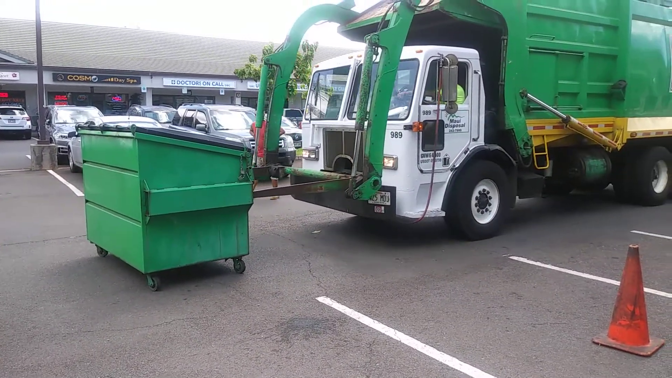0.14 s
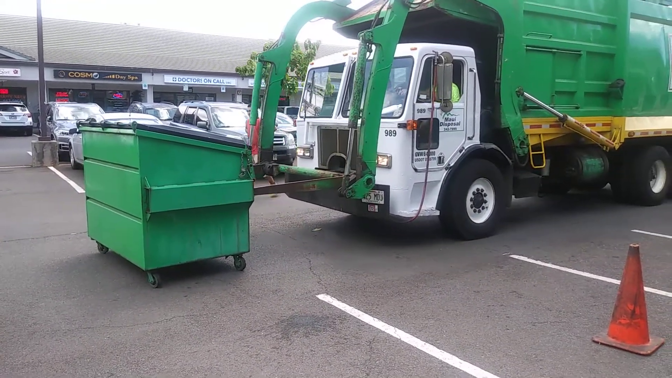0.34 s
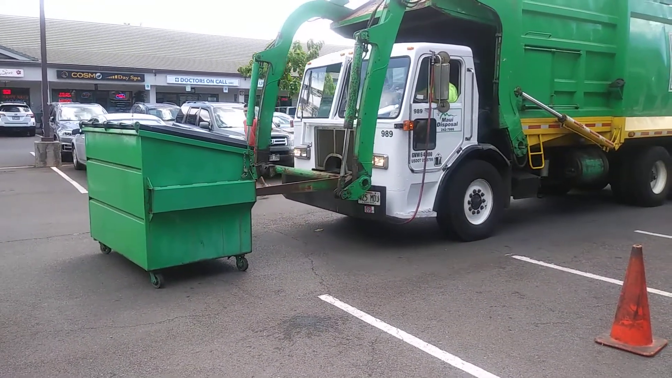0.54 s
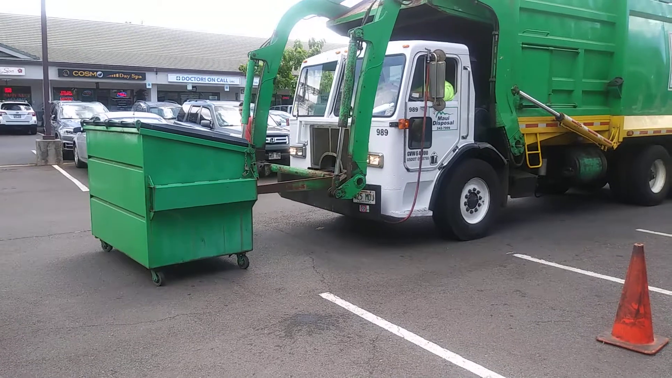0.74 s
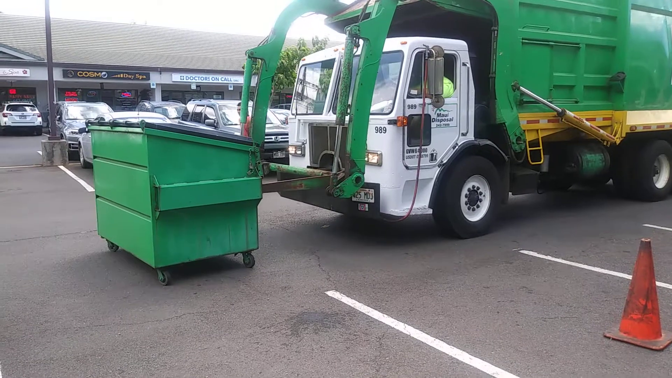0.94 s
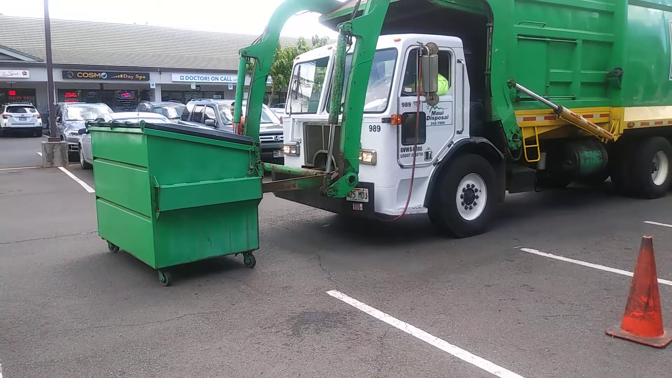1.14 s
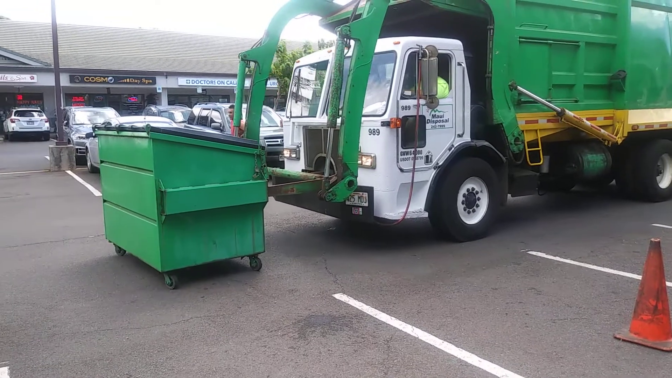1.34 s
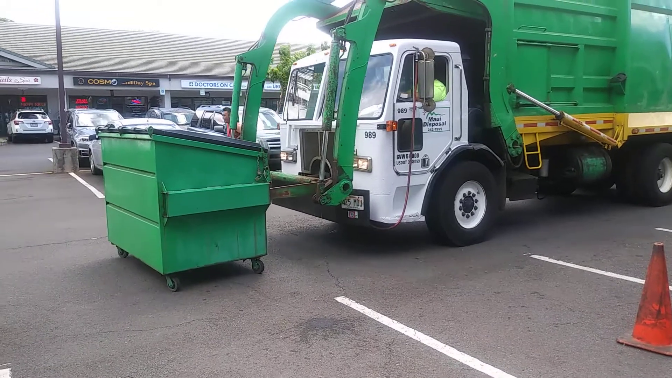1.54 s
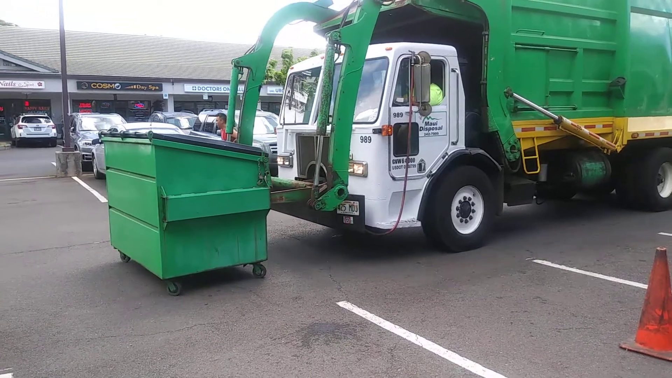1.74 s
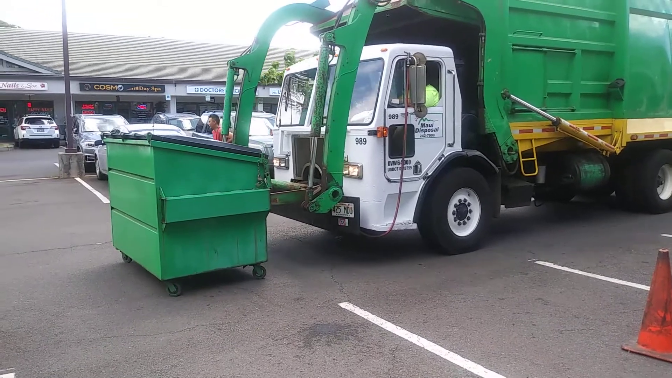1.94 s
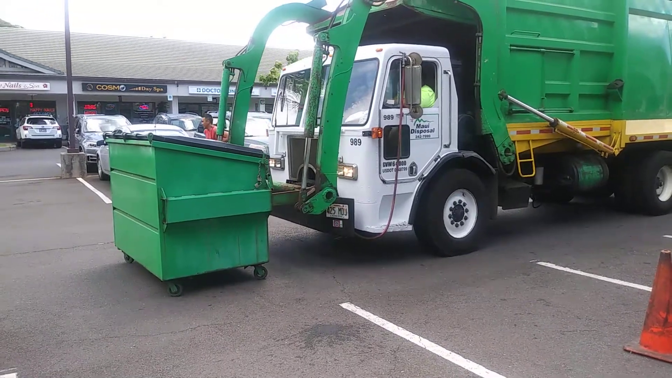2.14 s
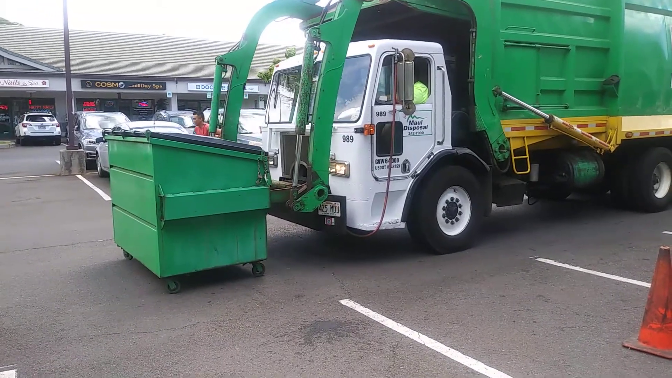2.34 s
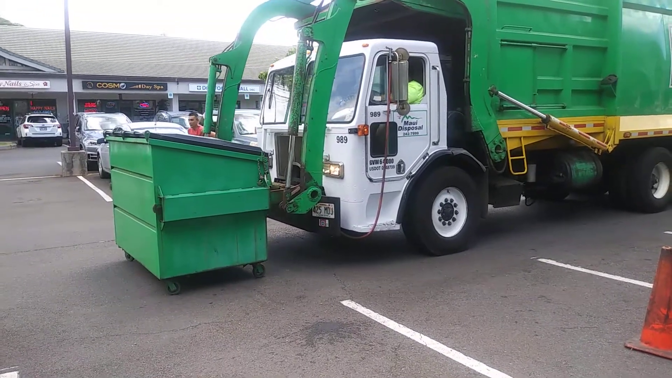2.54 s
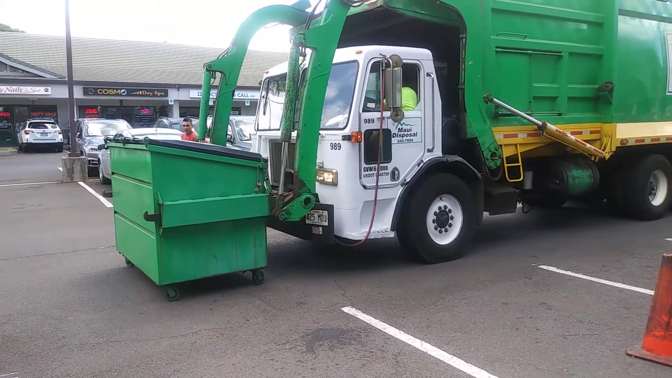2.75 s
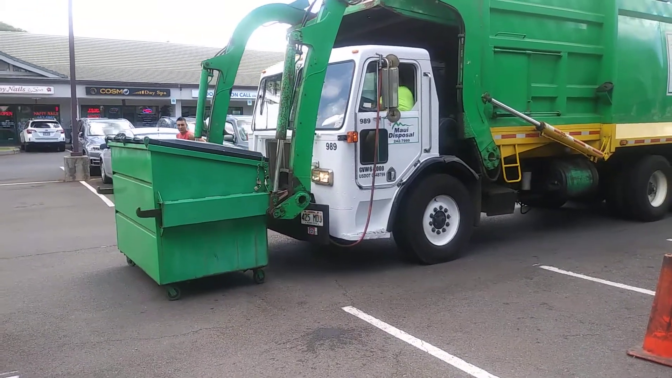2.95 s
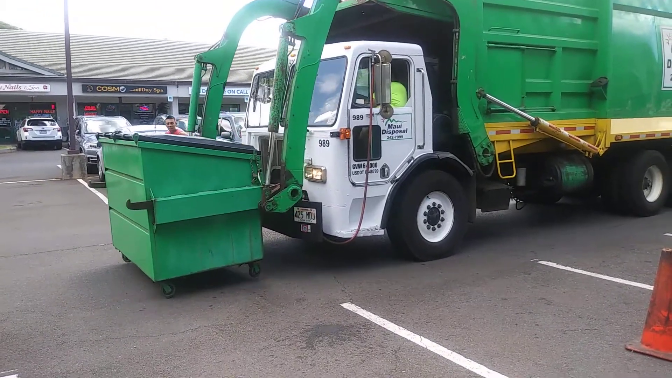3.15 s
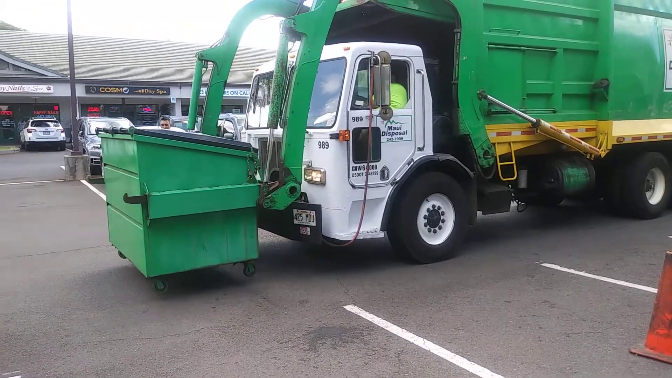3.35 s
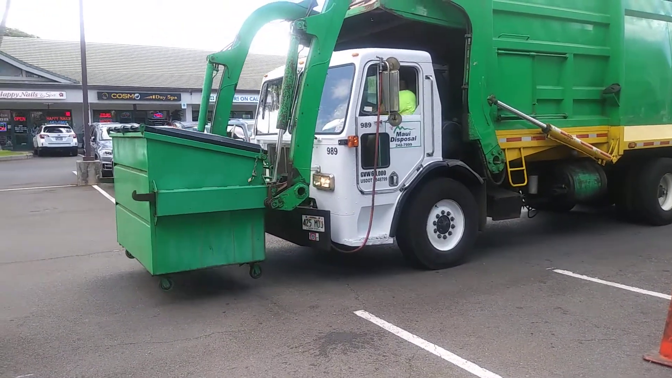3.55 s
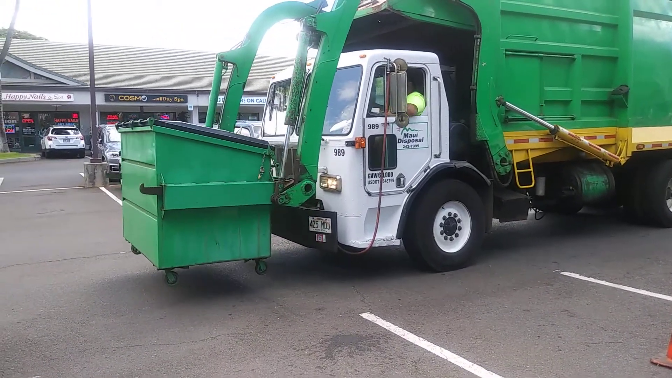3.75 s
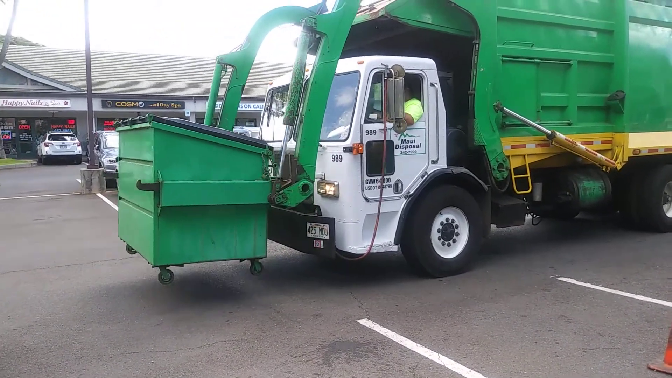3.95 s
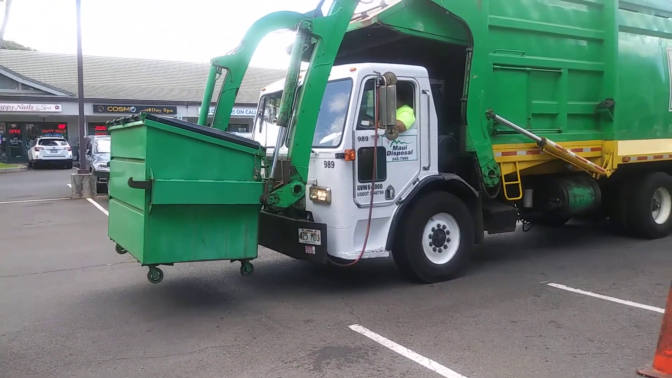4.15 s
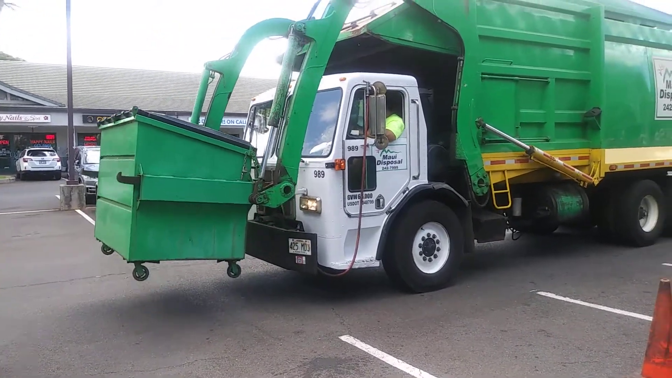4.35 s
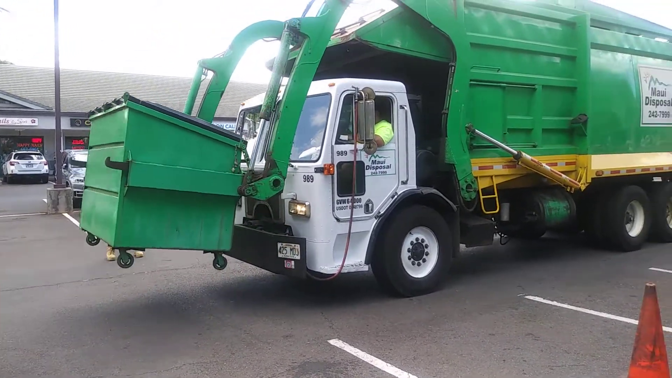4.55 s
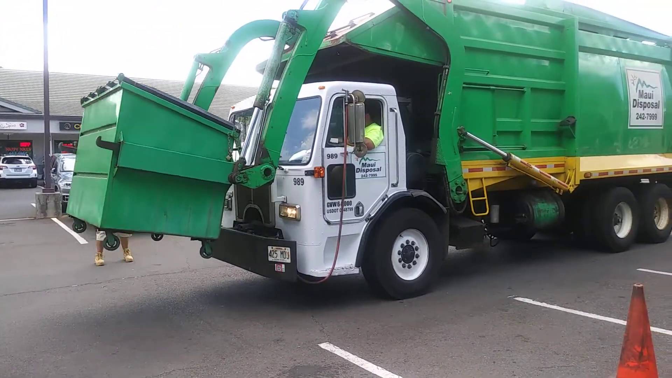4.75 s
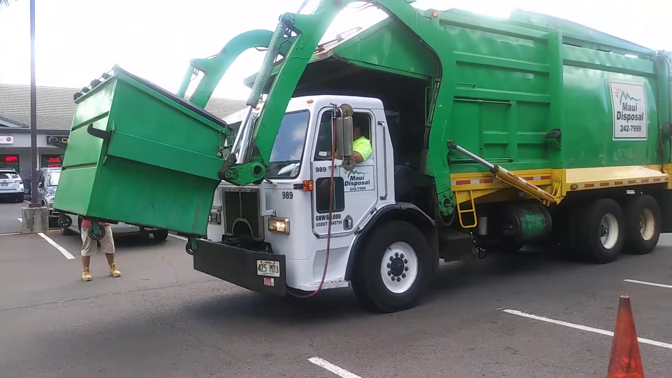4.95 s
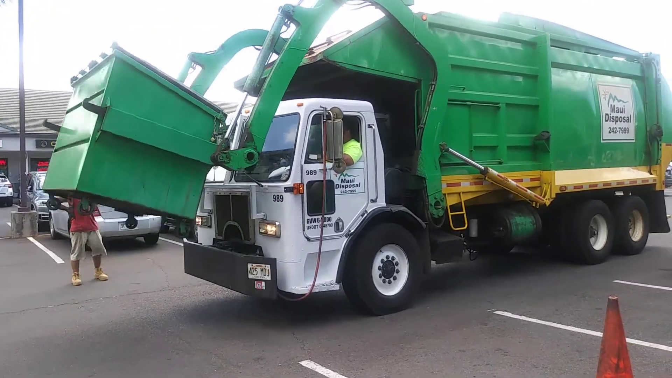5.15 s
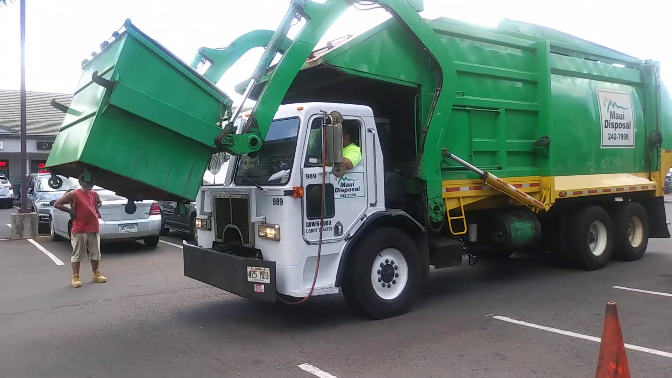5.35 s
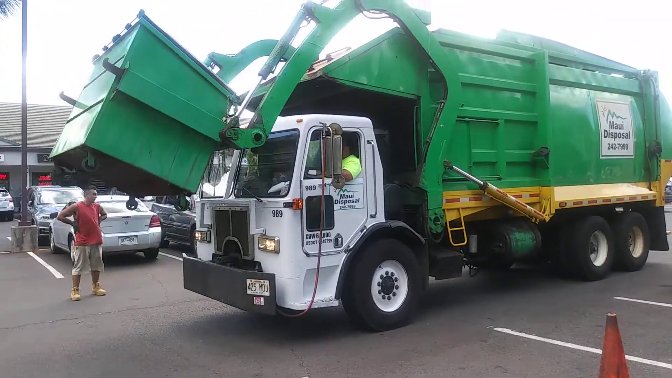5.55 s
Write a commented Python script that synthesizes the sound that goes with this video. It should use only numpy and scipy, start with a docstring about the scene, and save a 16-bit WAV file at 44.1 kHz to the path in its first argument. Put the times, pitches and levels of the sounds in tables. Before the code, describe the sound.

Muffled, flickering truck idle with knocks and thin squeals, then a loud clank and a sudden engine roar that dips and revs upward.

```python
"""A refuse truck's diesel idles in a parking lot, its steady roar held down to flickering patches
by a pocket camera's noise suppressor over a far traffic murmur. Three ringing bands, knocks and thin
squeals stay audible. At 2.9 s a loud knock falls as the roar bursts through and the ringing fades out;
after a brief dip near 4.1 s the engine revs up, as if to lift a steel bin, and clean tones swell in.
Roar, ringing and knocks are resonated noise, squeals and tones are sines; peaks meet a ceiling."""
import sys
import numpy as np
from scipy import signal
from scipy.fft import rfft, irfft
from scipy.io import wavfile
from scipy.ndimage import uniform_filter1d, map_coordinates

SR = 44100
rng = np.random.default_rng(int(sys.argv[2]) if len(sys.argv) > 2 else 0)


def int16_out(signal):
    """Quantize to a 16-bit WAV file."""
    q = np.round(np.clip(np.atleast_2d(signal).T, -1, 1) * 32767)
    wavfile.write(sys.argv[1], SR, q.astype(np.int16))


def elevation(decibels):
    """Turn decibel levels (scalar or array-like) into linear amplitude ratios."""
    levels = np.asarray(decibels, float)
    return 10 ** (levels / 20)


N = 246519


def curve(rows):
    """Columns of a breakpoint table, drawn as straight lines over time."""
    s, *columns = np.transpose(rows)
    return [np.interp(np.arange(N) / SR, s, column) for column in columns]


def rms_one(x):
    """Scale to rms 1."""
    return x / np.sqrt(np.mean(x ** 2) + 1e-20)


def resonate(x, hz, width_hz):
    """Two-pole resonance with gain 1 at its peak; a narrower one rings longer."""
    r = np.exp(-np.pi * width_hz / SR)
    feedback = [1, -2 * r * np.cos(2 * np.pi * hz / SR), r * r]
    return signal.lfilter([(1 - r * r) / 2, 0, (r * r - 1) / 2], feedback, x)


def drift(rate_hz):
    """Slow random wander of rms 1: white noise through two equal low-pass poles."""
    r = np.exp(-2 * np.pi * rate_hz / SR)
    noise = rng.standard_normal(N + SR)
    settled = signal.lfilter([1], [1, -2 * r, r * r], noise)[SR:]
    return rms_one(settled)


def coloured(x, spectrum, peaks):
    """Shape a noise by a spectrum and a few resonance peaks; rms 1."""
    hz = np.fft.rfftfreq(N, 1 / SR)[1:]
    corner_hz, corner_db = np.transpose(spectrum)
    colour = np.interp(np.log(hz), np.log(corner_hz), corner_db)
    for centre, width, db in peaks:
        colour += db / (1 + (2 * (hz - centre) / width) ** 2)
    gain = np.append(0, elevation(colour))   # no DC
    return rms_one(irfft(rfft(x) * gain, N))


def strand(x, hz, width_hz):
    """Noise twice through a narrow resonance, its level partly evened; rms 1."""
    evenness, even_over_s = 0.38, 0.036
    rung = rms_one(resonate(resonate(x, hz, width_hz), hz, width_hz))
    power = np.abs(uniform_filter1d(rung ** 2, size=round(even_over_s * SR))) + .02
    return rms_one(rung / power ** (evenness / 2))


def firing_beat(phase, depth_db, uneven_db):
    """Gain that puffs up at each firing and decays; one cylinder of six adds uneven_db."""
    puff = np.exp(-2.5 * (phase % 1)) - .37
    return elevation(depth_db * puff + uneven_db * (phase % 6 < 1))


def rumble():
    """Low, lumpy murmur of far traffic: coloured noise of slowly wandering level."""
    # murmur spectrum: f/Hz, relative level/dB per Hz
    murmur_colour = [(18, -73), (30, -44.5), (54, -20), (119, -32), (151, 3.5), (371, -14.5), (400, -13),
                     (520, -43.5), (880, -120)]
    murmur = coloured(rng.standard_normal(N), murmur_colour, [])
    return elevation(-63 + 1.4 * drift(4.5)) * murmur


def roar(phase):
    """Combustion rattle, fan and pump: coloured noise beating with the firings, combed by near echoes."""
    # engine noise spectrum: f/Hz, relative level/dB per Hz
    roar_colour = [(35, -59), (60, -41.5), (220, -19), (320, -7.5), (359, -9), (394, -5.5), (613, -7.5),
                   (953, 2.5), (1260, -0.5), (2530, -4), (2980, -4), (4420, -13), (7030, -33.5),
                   (11200, -44.5), (15500, -55.5)]
    # body resonances: f/Hz, width/Hz, boost/dB
    body_peaks = [(990, 130, -2.5), (887, 330, 1), (1355, 120, 4.5), (1496, 53, 2.5), (1650, 20, 2),
                  (2020, 410, 0.5), (3190, 1200, 6.5), (4650, 36, -2), (4520, 22, -15.5)]
    # echoes off asphalt, bin and shop fronts: delay/s, level/dB
    echo_taps = [(.0117, -17.0), (.0193, -17.0), (.0311, -18.0), (.047, -19.0)]
    # narrow strands of panels and pump: f/Hz, width/Hz, level/dB against the coloured noise
    singing_strands = [(877, 35, -23), (990, 100, -19.5), (1339, 33, -25), (1429, 37, -25.5),
                       (1543, 40, -22), (1900, 23, -32), (2030, 64, -26.5), (2880, 140, -28),
                       (3100, 46, -30), (3290, 32, -25.5), (4476, 61, -35)]
    beat = firing_beat(phase, depth_db=3.5, uneven_db=0.0)
    noise = rng.standard_normal(N) * beat * elevation(0.51 * drift(5.5))
    noise = noise + sum(elevation(db) * np.roll(noise, round(s * SR)) for s, db in echo_taps)
    sung = 0
    for hz, width, db in singing_strands:
        sung = sung + elevation(db + 4.04 * drift(2.05)) * strand(noise, hz, width)
    return elevation(-14) * (coloured(noise, roar_colour, body_peaks) + sung)


def band_levels(t):
    """Levels in dB of the suppressor's five bands at times t; two of them follow their neighbours."""
    # middle of the roar: t/s, level/dB
    middle_rows = [(0, -47.5), (1.26, -46), (2.06, -43), (2.57, -40), (2.84, -35.5), (2.89, -15.5),
                   (3.09, -14.5), (3.2, -17), (3.27, -22.5), (3.34, -20.5), (3.37, -14), (3.75, -16),
                   (3.94, -17), (3.98, -22), (4.04, -25.5), (4.07, -33), (4.12, -25.5), (4.22, -21),
                   (4.39, -17), (5.08, -14), (5.59, -14.5)]
    # bass of the roar: t/s, level/dB
    bass_rows = [(0, -50.5), (1.299, -54), (2.841, -58.5), (2.89, -29.5), (3.2, -21.5), (3.34, -34),
                 (3.55, -34), (3.75, -45.5), (3.9, -54), (4.13, -51), (4.202, -35), (4.5, -31.5),
                 (5.59, -32.5)]
    # treble of the roar: t/s, level/dB
    treble_rows = [(0, -60), (1.3, -58.5), (2.76, -45.5), (2.84, -41.5), (2.88, -28), (3.012, -27),
                   (3.03, -17), (3.09, -25), (3.27, -41), (3.29, -29.5), (3.34, -38.5), (3.36, -17),
                   (3.48, -27), (3.54, -21), (3.802, -30.5), (3.82, -25), (3.94, -30), (4.0, -39),
                   (4.07, -38.5), (4.14, -33.5), (4.22, -27.5), (4.5, -25.5), (5.59, -22)]
    # added to the two following bands: t/s, top level/dB, 3 kHz level/dB
    veil_rows = [(0, -2.5, 7.5), (2.84, -5, -4.5), (2.9, -8.5, -1.5), (3.28, -5.5, -7), (3.45, -7, 0),
                 (3.56, 3, 1.5), (3.9, -11.5, -1.5), (4.08, -8, 4.5), (4.12, 6, 8), (4.4, 1, 2.5),
                 (5.59, 2, 0)]
    middle, bass, treble = (np.interp(t, *np.transpose(rows)) for rows in (middle_rows, bass_rows, treble_rows))
    s, top_veil, presence_veil = np.transpose(veil_rows)
    # each takes a share of its neighbour's swing away from the final level
    presence = -22 + 1.16 * (middle - middle_rows[-1][1]) + np.interp(t, s, presence_veil)
    top = -41.5 + 0.66 * (treble - treble_rows[-1][1]) + np.interp(t, s, top_veil)
    return middle, bass, presence, treble, top


def suppressor(x):
    """Spectral gate: a cell passes as far as it stands above the running noise estimate."""
    # bands with levels of their own, in band_levels order: low f/Hz, high f/Hz
    gate_bands = [(800, 2400), (180, 450), (2700, 3600), (3800, 6800), (7500, 15000)]
    # where the noise estimate runs low (+) or high (-): f/Hz, width/Hz, offset/dB
    estimate_bias = [(493, 91, 7), (842, 89, 7.5), (1115, 116, -5), (1477, 180, 4.5), (1760, 280, -8),
                     (2000, 61, 7.5), (2260, 200, 4), (2490, 190, -6), (3120, 280, 8), (3950, 130, 0.5),
                     (4640, 240, 2), (4850, 140, -11), (4600, 120, -2.5), (5500, 67, -8.5), (6700, 89, 3),
                     (7500, 240, 6), (8300, 230, 1.5)]
    floor_db, soft_db, hold_s, stale = -29.0, 1.3, .045, .6   # stale: weight of the old glimpse
    hz, t, cells = signal.stft(x, SR, nperseg=512, noverlap=384)
    power, hop_s = np.abs(cells) ** 2 + 1e-16, t[1] - t[0]
    now = uniform_filter1d(power, size=max(int(hold_s / hop_s), 1), axis=1)
    steady = uniform_filter1d(power, size=150, axis=1)
    # the estimate leans on a short glimpse renewed about five times a second; its errors last as stripes
    glimpse = uniform_filter1d(power, size=16, axis=1)[:, ::70]
    glimpse = np.repeat(glimpse, 70, axis=1)[:, :len(t)]
    excess = 10 * np.log10(now / steady) - stale * 10 * np.log10(glimpse / steady)
    excess -= .7 * excess.mean(axis=0)   # a swell of the whole spectrum counts little
    for centre, width, db in estimate_bias:
        excess += (db * np.exp(-(2 * (hz - centre) / width) ** 2))[:, None]

    def gate(above):
        """Smooth gain step from the floor up to about 2/3."""
        opening = 1 / (1.5 + np.exp(np.clip(-above / soft_db, -50, 50)))
        return elevation(floor_db) + (1 - elevation(floor_db)) * opening

    # how much power each threshold lets through, on a thinned grid of cells
    steps = np.linspace(16, -16, 65)
    sample, weight = excess[::3, ::7], (power / steady)[::3, ::7]
    passed = [10 * np.log10(np.mean(gate(sample - s) ** 2 * weight)) for s in steps]
    # how much of each band is to pass, in dB
    wanted = []
    for (low, high), level_db in zip(gate_bands, band_levels(t)):
        # 4/3 turns one-sided Hann cell power into mean square
        inside = power[(hz > low) & (hz < high)].sum(axis=0).mean() * 4 / 3
        wanted.append(level_db - 10 * np.log10(inside))
    # blend from bass to top along log frequency
    corner_hz = [330, 800, 2200, 2800, 3500, 4500, 6500, 9000]
    place = np.interp(np.log(hz + 1), np.log(corner_hz), [0, 1, 1, 2, 2, 3, 3, 4])
    where = np.meshgrid(place, np.arange(len(t)), indexing="ij")
    share = map_coordinates(np.array(wanted)[[1, 0, 2, 3, 4]], where, order=1)
    threshold = np.interp(share, passed, steps)
    beyond = share - np.clip(share, passed[0], passed[-1])   # outside the gate's range the level shifts
    gated = cells * gate(excess - threshold) * elevation(beyond)
    return signal.istft(gated, SR, nperseg=512, noverlap=384)[1][:N]


def ringing(phase):
    """Firing rattle through narrow resonances that switch up and down, swaying with the engine cycle."""
    # base level of the three bands: t/s, level/dB near 850 Hz, level/dB near 3 kHz, level/dB near 5 kHz
    ring_levels = [(0, -39.5, -50, -58), (.3, -53.5, -39.5, -69), (.9, -41, -38.5, -66),
                   (1.05, -35, -36, -65), (1.65, -35.5, -36, -64), (1.75, -43, -38, -66),
                   (1.88, -40, -29, -67), (1.93, -32, -32.5, -60), (2.7, -36.5, -29, -53),
                   (2.78, -54, -27, -48), (2.9, -50, -21, -46)]
    # resonances of each band: f/Hz, width/Hz, relative level/dB, switching depth/dB
    ring_modes = [
        [(781, 82, -9, 8), (854.4, 76, 1.5, 1), (969, 23, -19.5, 12.5)],
        [(2850, 72, 2.5, 1.5), (3015, 104, 6.5, 6.5), (3180, 94, 3.5, 8.5), (3322, 54, 2, 1),
         (3438, 118, -14.5, 24.5)],
        [(5090, 220, 4, 6), (5283, 41, -2, 2.5)],
    ]
    # for each band: random flicker/dB
    ring_flicker = [2.5, 1.5, 4.5]
    # for each band: lift at the start of an engine cycle/dB
    ring_swell = [-0.5, 1.0, 7]
    # for each band: sag by the end of each half cycle/dB
    ring_sag = [6.5, 3.0, 3]
    out = np.zeros(N)
    fade = np.interp(np.arange(N) / SR, [2.86, 2.92], [1, 0])
    cycle = (phase - phase[round(.52 * SR)]) / 6 % 1   # six firings, a cycle starting at 0.52 s
    bands = zip(curve(ring_levels), ring_modes, ring_flicker, ring_swell, ring_sag)
    for level_db, modes, flicker_db, swell_db, half_db in bands:
        level_db = level_db - half_db * (2 * cycle % 1) ** 2
        band = 0
        for hz, width, db, switch_db in modes:
            rattle = rng.standard_normal(N) * firing_beat(phase, depth_db=7.0, uneven_db=1.0)
            rung = strand(rattle, hz, width)
            band = band + rung * elevation(db + switch_db * np.tanh(2.0 * drift(11.8)))
        swell = elevation(level_db + flicker_db * drift(14.4) + swell_db * np.exp(-3.0 * cycle))
        out += uniform_filter1d(swell, size=260) * rms_one(band)
    return out * fade


def rattles():
    """Small loose parts at idle: rows of chance bursts between 1 and 5 kHz, the high ones softer."""
    per_s, end_s, spread_db = 22.0, 2.8, 4.5
    when, size, pitch, length = rng.random((round(per_s * end_s), 4)).T
    hz = 1050 * 4.5 ** pitch
    db = -39 + spread_db * (2 * size - 1) - 14.0 * pitch ** 3
    width_hz = 220
    return [(s * end_s, d, f, width_hz, 0.023 * (.4 + n)) for s, d, f, n in zip(when, db, hz, length)]


def knocks():
    """Short noise bursts, sudden at the front, rung twice through one resonance each."""
    # knocks and clanks: t/s, nominal peak level/dB, f/Hz, width/Hz, length/s
    knock_rows = [(0.018, -23.5, 905, 150, 0.015), (0.055, -32, 2430, 119, 0.048),
                  (.08, -23, 810, 150, 0.0079), (0.146, -24.5, 928, 150, 0.045),
                  (0.231, -25.5, 516, 397, .045), (0.219, -31, 2940, 350, 0.078),
                  (0.335, -22, 990, 119, .022), (0.502, -20.5, 440, 388, 0.01),
                  (.526, -23, 464, 454, 0.026), (0.551, -27.5, 510, 500, 0.038),
                  (.712, -22, 870, 200, 0.015), (.893, -33.5, 4485, 80, 0.036),
                  (0.897, -28, 1180, 150, 0.019), (0.999, -28.5, 700, 100, 0.064),
                  (1.199, -28.5, 720, 100, .094), (1.352, -34, 1430, 150, 0.036),
                  (1.424, -35, 484, 150, 0.061), (1.58, -31, 2850, 197, 0.051),
                  (1.856, -32, 528, 120, 0.043), (2.029, -32, 1370, 197, 0.09),
                  (2.506, -25.5, 2030, 298, 0.071), (2.604, -21.5, 1460, 248, 0.048),
                  (2.683, -23.5, 2200, 304, 0.062), (2.775, -35, 1400, 199, 0.031),
                  (2.862, -8, 1670, 900, 0.064), (3.026, -17, 6150, 3700, 0.013),
                  (3.351, -17, 4500, 3000, .017), (3.824, -39, 4500, 3000, .01)]
    # one clack each engine cycle at idle: t/s, nominal peak level/dB, f/Hz
    clack_rows = [(.53, -30.5, 2090), (.731, -35, 2230), (.896, -35, 2120), (1.078, -31.5, 2020),
                  (1.267, -34, 2000), (1.456, -28.5, 2230), (1.648, -31.5, 2260), (1.831, -19, 2150),
                  (2.024, -22.5, 2120), (2.21, -27.5, 2160), (2.419, -31, 2200), (2.604, -27, 2100),
                  (2.77, -27.5, 2020)]
    # dull thuds of the bin and forks: t/s, nominal peak level/dB, f/Hz
    thud_rows = [(.084, -49, 258), (.289, -39.5, 197), (0.52, -34.5, 154), (0.696, -41, 223),
                 (.789, -40, 200), (.877, -35.5, 206), (1.021, -36.5, 191), (1.3, -38.5, 256),
                 (1.398, -36.5, 190), (2.341, -41, 215)]
    out = np.zeros(N)
    clacks = [(*row, 184, 0.049) for row in clack_rows]   # width in Hz, length in s
    thuds = [(*row, 140, 0.076) for row in thud_rows]
    for s, db, hz, width, length in knock_rows + clacks + thuds + rattles():
        t = np.arange(int(.25 * SR)) / SR
        shape = np.minimum(t / 0.0017, 1) * np.exp(-(t / length) ** 1.6)
        rattle = rng.standard_normal(len(t)) * shape
        rattle[0] = 0.62 * np.sqrt(SR / width)   # first contact, a click ahead of the rattle
        burst = resonate(resonate(rattle, hz, width), hz, width)
        at = round(s * SR)
        body_rms = np.sqrt(np.mean(burst[:int(length * SR)] ** 2))
        out[at:at + len(t)] += elevation(db - 10.5) * burst / body_rms   # peak to rms: 10.5 dB
    return out


def squeals():
    """Brake and arm squeals: thin sines, unsteady in pitch and level, that start quickly and trail away."""
    # squeals: start t/s, end t/s, first f/Hz, last f/Hz, mean level/dB before the fades
    squeal_rows = [(.02, .08, 14250, 14250, -66), (.13, 0.224, 12800, 13000, -73),
                   (0.206, 0.462, 12100, 12500, -60.5), (.68, 0.958, 12750, 12800, -74),
                   (2.1, 2.3, 13700, 13550, -70), (0.66, 1.194, 7470, 8040, -66),
                   (1.466, 1.8, 7570, 7500, -64.5), (2.02, 2.244, 14200, 14450, -58),
                   (2.048, 2.432, 8590, 8700, -52.5), (2.525, 2.668, 8930, 9030, -61),
                   (2.648, 3.0, 13250, 13400, -64), (3.505, 3.602, 14150, 14170, -50)]
    out, t = np.zeros(N), np.arange(N) / SR
    waver, flutter = drift(25), drift(30)
    for start, end, hz0, hz1, db in squeal_rows:
        shape = np.interp(t, [start, start + .02, (start + end) / 2, end], [0, 1, .6, 0])
        hz = np.interp(t, [start, end], [hz0, hz1]) + 22.0 * waver
        out += elevation(db + 6.4 * flutter) * shape * np.sin(2 * np.pi * np.cumsum(hz) / SR)
    return out


def tones(phase):
    """Exhaust, gear and pump: wavering sines locked to engine speed, swelling in as they meet resonances."""
    # tones: multiple of the firing rate, mean level/dB, start t/s, end t/s
    tone_rows = [(3.0, -41, 5.1, 5.7), (4.46, -34, 4.55, 5.0), (5.0, -26, 4.88, 5.7), (6.0, -28, 5.22, 5.7),
                 (7.55, -38, 5.1, 5.7), (12.33, -33, 4.8, 5.7), (14.8, -29, 5.2, 5.7),
                 (18.55, -26, 5.2, 5.7), (20.15, -29, 4.8, 5.7), (26.2, -28, 4.6, 5.45),
                 (43.35, -32, 5.1, 5.7), (52.35, -38, 5.1, 5.7), (60.4, -40, 5.1, 5.7),
                 (65.45, -37, 5.0, 5.7)]
    out, t = np.zeros(N), np.arange(N) / SR
    for multiple, db, start, end in tone_rows:
        swell = np.interp(t, [start, start + .18, end - .08, end], [0, 1, 1, 0])
        sine = np.sin(2 * np.pi * multiple * phase + rng.uniform(0, 7.05))
        out += swell * elevation(db + 0.73 * drift(13.0)) * sine
    return out


def scene():
    """Engine roar through the suppressor, the rest on top; one phase, counted in firings, drives the engine."""
    # engine speed: t/s, firing rate/Hz
    engine_speed = [(0, 32.0), (4.1, 32.0), (4.4, 42.0), (4.7, 50.8), (4.8, 54.6), (4.9, 57.2), (5.0, 59.3),
                    (5.1, 61.4), (5.2, 63.9), (5.3, 65.2), (5.4, 66.3), (5.5, 66.9), (5.59, 67.2)]
    phase = np.cumsum(curve(engine_speed)[0]) / SR
    engine = suppressor(roar(phase)) + ringing(phase) + tones(phase)
    return (engine + rumble() + knocks() + squeals())[None]


def low_pass(x):
    """Removes everything above the highest recorded frequency."""
    return signal.sosfilt(signal.butter(12, 15640, fs=SR, output="sos"), x)


def record(dry):
    """Microphone port notches, a bass cut and a ceiling that rounds off the peaks."""
    # microphone port: f/Hz, width/Hz
    port_notches = [(7150, 400), (9500, 690)]
    x = dry
    for hz, width in port_notches:
        x = x - .9 * resonate(x, hz, width)
    x = signal.sosfilt(signal.butter(2, 150.0, "high", fs=SR, output="sos"), x)
    ceiling, knee = .55, 6.0   # a higher knee bends later and harder
    x = x / (1 + np.abs(x / ceiling) ** knee) ** (1 / knee)
    return low_pass(x)


dry = scene()
out = record(dry)
int16_out(out)
```